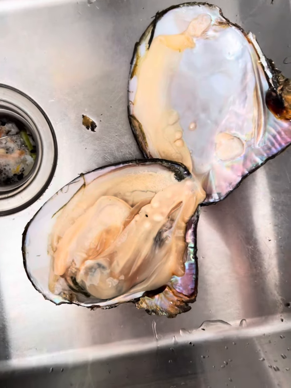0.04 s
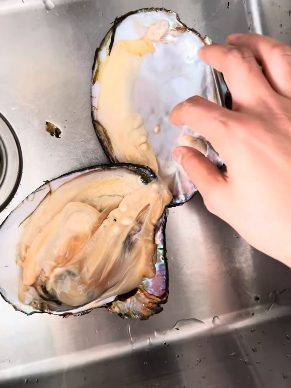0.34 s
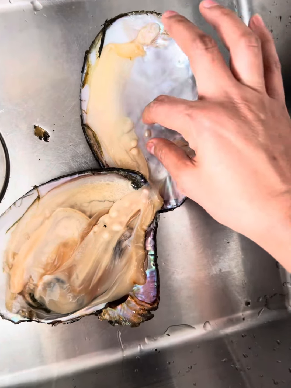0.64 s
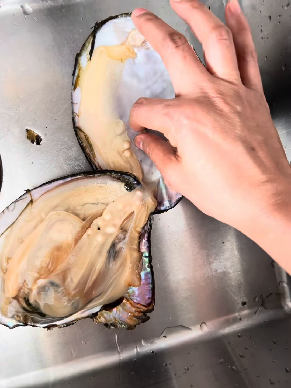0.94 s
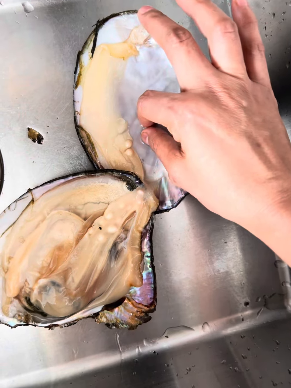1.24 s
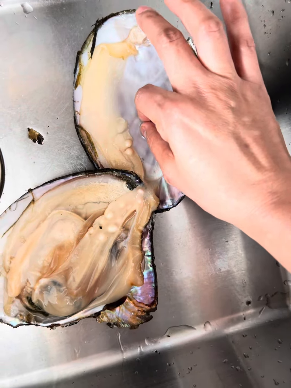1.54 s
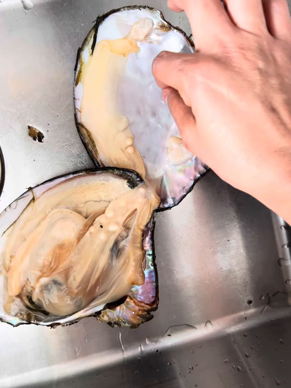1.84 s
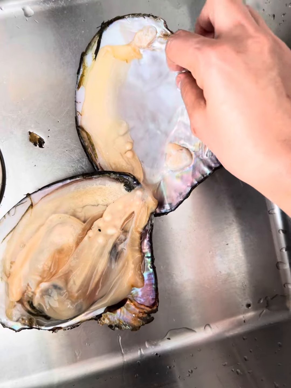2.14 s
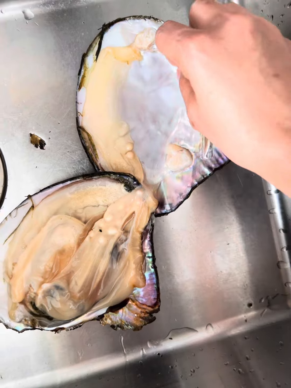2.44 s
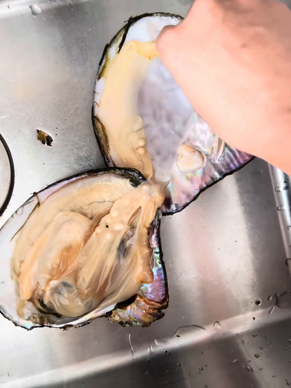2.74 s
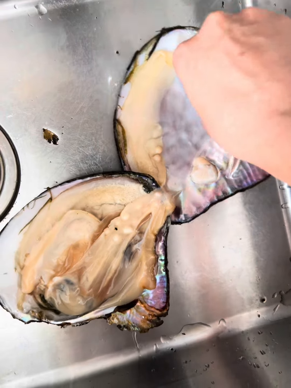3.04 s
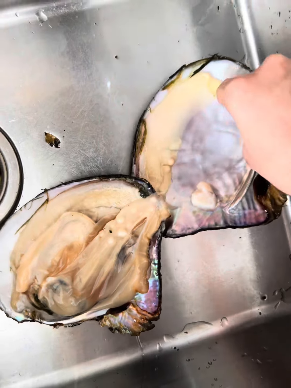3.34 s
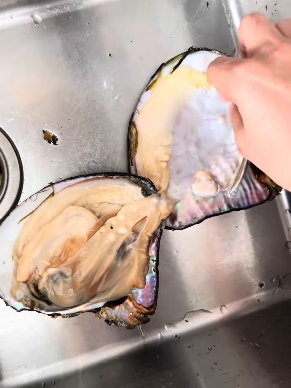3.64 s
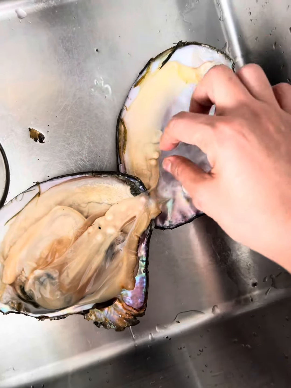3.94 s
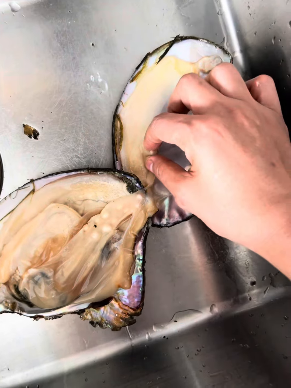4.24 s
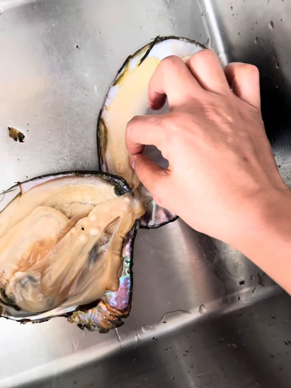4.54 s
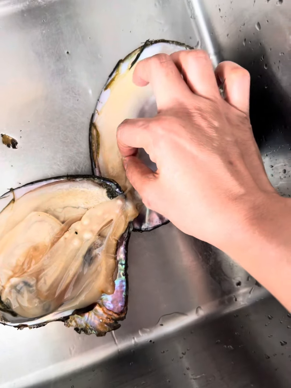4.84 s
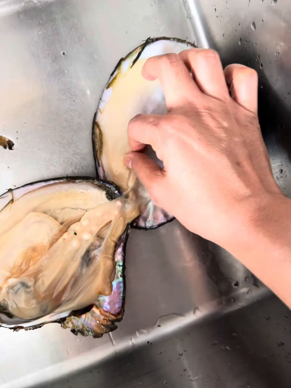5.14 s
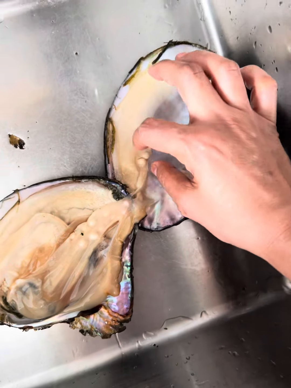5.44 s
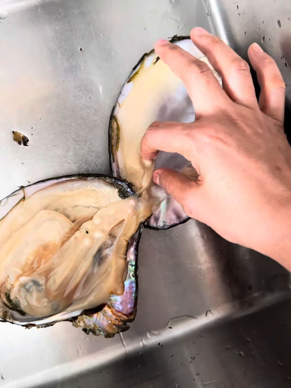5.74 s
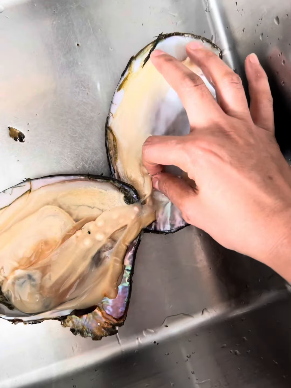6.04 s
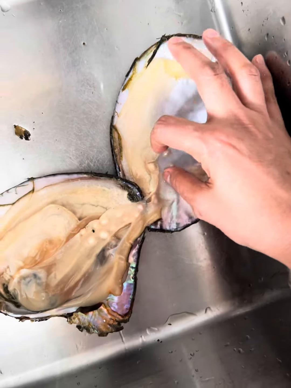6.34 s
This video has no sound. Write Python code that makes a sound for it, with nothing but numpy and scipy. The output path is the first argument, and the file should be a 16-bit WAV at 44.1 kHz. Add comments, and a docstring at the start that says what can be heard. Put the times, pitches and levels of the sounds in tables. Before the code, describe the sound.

Close up in a small kitchen, a hand picks at an opened shell lying in a stainless steel sink. Soft handling rumble and faint ticks give way to sharp fingernail clicks. The shell scrapes briefly over the steel, then rocks and knocks against the basin, which answers with short hollow booms. The knocks come thicker and louder near the end. An appliance hums steadily behind.

```python
"""Picking at a shell in a steel sink

A small kitchen, the microphone close to an opened shell lying in a stainless steel sink.
A hand picks at it: nails and chips click on the shell, it slides a little over the wet steel,
then rocks and knocks on the basin, whose thin floor booms. An appliance hums steadily behind."""
import sys
import numpy as np
from scipy import signal
from scipy.fft import rfft, irfft, next_fast_len
from scipy.io import wavfile
from scipy.ndimage import map_coordinates

SR = 44100
rng = np.random.default_rng(int(sys.argv[2]) if len(sys.argv) > 2 else 0)


def transcribe(u):
    """Save the signal u as a 16-bit wav file named by the first command-line argument.

    u: samples, shape (n,) or (channels, n), limited to [-1, 1]; the rate is SR.
    q: integer samples, one column per channel.
    """
    v = np.clip(np.atleast_2d(u).T, -1, 1)
    q = np.round(v * 32767).astype(np.int16)
    wavfile.write(sys.argv[1], SR, q)


N = 286209


def basin_knocks(modes_db=-14, crowd_db=9, bloom_s=0.003, rise_s=0.00015, rebound_s=0.045):
    """The shell's rim hits the basin: a clack, then the thin steel booms, damped by the wet shell."""
    # rim on steel: start_s, level_db, hardness_db, weight_db
    knocks = [(2.753, -39, -16, -19), (3.476, -21.5, -8, -0.5), (3.495, -33.5, -4.5, -11),
              (3.565, -28.5, -9, -1), (3.75, -40, -29, -15), (4.561, -27, -16.5, -0.5),
              (5.264, -36.5, -14, 3), (5.285, -37.5, -2, 2), (5.342, -30.5, -15, 4), (5.405, -36.5, -16, 0),
              (5.721, -30, -11.5, -8), (5.853, -17.5, 3, -2), (5.897, -21.5, -10.5, 2),
              (6.026, -30.5, -14, 10), (6.314, -33.5, -14, 7.5), (6.406, -15.5, -1, -2.5),
              (6.425, -16.5, -3, -11), (6.461, -25.5, -11, -10)]
    # the basin's strongest modes: pitch_hz, level_db, t60_s
    basin_modes = [(88, -10, 0.23), (161, -17, 0.14), (201.9, 16.5, 0.44), (212, -21, 0.17),
                   (267.6, 16, 0.19), (373, -2, 0.17), (417.4, 5, 0.062), (600.6, -3.5, 0.66),
                   (675, -5.5, 0.12), (790, -16, 0.084), (811, 0, 0.072), (956, -9.5, 0.16),
                   (1113.4, -13, .22), (1203, -5.5, 0.032), (1390, -17.5, 0.098), (1666, -15.5, .25),
                   (1993, -10, .15), (2385, -2, 0.082), (2500, 1, 0.059), (2600, -9, 0.19),
                   (2744, -24, 0.11), (3080, -38, .15)]
    # its crowd of weaker modes: frequency_hz, density_db
    crowd_spectrum = [(40, -21), (90, -27), (170, -0.5), (280, 9), (490, -10), (650, -6.5), (1300, -8),
                      (2600, -7), (3800, -15), (5200, -32), (9000, -41.5), (16000, -97)]
    # how long that crowd rings: frequency_hz, t60_s
    crowd_decay = [(100, 0.34), (700, 0.13), (2500, 0.062), (8000, 0.047)]
    # the basin's answer where the shell rests: time_s, hollow_note_hz, boom_db
    resting_spots = [(3.6, 595, -1), (4.55, 780, -10), (5.35, 815, -3), (5.75, 677, -1.5), (6.05, 677, -6),
                     (6.35, 566, -4.5)]
    spot_s, spot_hz, spot_db = np.transpose(resting_spots)
    out, t, last_s = np.zeros(N), np.arange(SR // 2) / SR, -np.inf
    attack = 1 - np.exp(-t / rise_s)
    for start_s, level_db, hardness_db, weight_db in knocks:
        blow = amp(modes_db) * ring(basin_modes, t, scatter_db=1.5, detune=0.0009, longest_s=0.21)
        blow += amp(crowd_db) * shaped(dying_noise(crowd_decay, len(t)) * attack, crowd_spectrum)
        # the low modes take some milliseconds to build up
        low = signal.sosfiltfilt(signal.butter(2, 330, fs=SR, output="sos"), blow)
        blow -= low * np.exp(-t / bloom_s) * attack
        # contacts lighter than a medium -31 dB favour the boom, hard ones the treble
        boom_db = np.interp(start_s, spot_s, spot_db) - 0.31 * (level_db + 31)
        blow = shaped(blow, [(200, boom_db), (520, 0), (1200, 0.011), (2800, hardness_db)])
        # on a rebound the floor is still loaded: a higher thump, a weaker hollow note
        thump_hz, note_db = (131, 5) if start_s - last_s < rebound_s else (81.7, 9)
        note_hz = np.interp(start_s, spot_s, spot_hz)
        blow = shaped(blow, [(note_hz / 1.3, 0), (note_hz, note_db), (note_hz * 1.26, 0)])
        add(out, start_s, amp(level_db) * (blow + amp(weight_db) * floor_thump(t, thump_hz)))
        last_s = start_s
    return out


def floor_thump(t, end_hz, start_hz=270, glide_s=0.01134, peak_s=0.026, sharpness=3.8):
    """Bending waves cross the basin's floor, short ones first: a falling pitch that swells and stops."""
    phase = 2 * np.pi * (end_hz * t + (start_hz - end_hz) * glide_s * (1 - np.exp(-t / glide_s)))
    envelope = (t / peak_s * np.exp(1 - t / peak_s)) ** sharpness
    tuning = 1 + 0.039 * rng.standard_normal()
    return envelope * np.sin(phase * tuning)


def shell_clicks(modes_db=-9, crack_db=-2, walls_db=-13, rise_s=0.00037, grip_s=4.0):
    """A brief crack rings the stiff, finger-damped shell and scatters between the basin's walls."""
    # nails and chips on the shell: start_s, level_db, snap_db, pitch_ratio
    contacts = [(1.198, -38, -17, 1), (2.093, -47, -4, 1.45), (2.682, -39.5, -2, 1),
                (2.6955, -23, 9.5, 1.06), (2.752, -36, -28, 1.2), (3.1753, -28, -12, .8),
                (3.6239, -18, 3, 1), (3.6377, -35, -2, 1.05), (5.1213, -51, -3, 1.2),
                (5.2889, -22.5, 2, 1.03), (5.3235, -33.5, -3.5, 1), (5.353, -40, -15, .85),
                (5.389, -38, -3, 1), (5.4161, -25, -13, 1), (6.0301, -24, -0.5, 1), (6.052, -36.5, -1, 1),
                (6.065, -41, -8, 1.3)]
    # a contact's burst: frequency_hz, density_db
    crack_spectrum = [(500, -26), (1400, 4.5), (2500, 12), (4000, 7.5), (7000, 1.5), (12500, -7.5),
                      (15500, -2.5)]
    out, t = np.zeros(N), np.arange(SR // 6) / SR
    attack = 1 - np.exp(-t / rise_s)
    burst_decay = amp(crack_db) * fade(t, t60_s=0.0057) + amp(walls_db) * fade(t, t60_s=0.059)
    # the shell's modes: pitch_hz, level_db, t60_s
    shell_modes = [(2060, -15, 0.023), (2616, -6.5, 0.025), (2630, 4, 0.016), (3467, 5, 0.036),
                   (3800, -3, 0.038), (4000, -27, .018), (4130, -26, 0.018), (5160, -4, 0.023),
                   (6400, -11, 0.045), (7600, -18, 0.024), (8800, -8.5, 0.029), (11570, -9, 0.02)]
    for start_s, level_db, snap_db, pitch_ratio in contacts + nail_ticks():
        burst = noise(crack_spectrum, len(t)) * burst_decay
        ringing = ring(shell_modes, t * pitch_ratio, scatter_db=0, detune=0.008, longest_s=0.022)
        click = (burst + amp(modes_db) * ringing) * attack
        # once the fingers press on the shell they damp its lowest modes
        body_db = -14.5 if start_s > grip_s else 1
        tone = [(700, body_db - 4.5), (2650, body_db), (3300, 0), (6000, snap_db / 4), (11000, snap_db)]
        add(out, start_s, amp(level_db) * shaped(click, tone))
    return out


def nail_ticks(per_s=1.5, level_db=-55, spread_db=2, snap_db=2, pitch_ratio=1.3):
    """Faint chance touches of the nails, as extra rows of contacts on the shell."""
    return [(rng.random() * N / SR, level_db + spread_db * rng.standard_normal(), snap_db, pitch_ratio)
            for _ in range(round(per_s * N / SR))]


def shell_slide(level_db=-47.5, catches_per_s=320, catch_share=0.48):
    """The shell's rough back catches and grates as it drags over wet steel."""
    # shell on steel: frequency_hz, density_db
    scrape_spectrum = [(200, -3), (700, 10.5), (1500, 0.5), (2400, 8.5), (3000, 1), (4000, -4),
                       (7000, -14.5), (12000, -21.5), (15500, -19)]
    catches = (rng.random(N) < catches_per_s / SR) * rng.standard_normal(N)
    rattle = fade(np.arange(SR // 50) / SR, t60_s=0.014)
    grit = np.sqrt(np.abs(signal.fftconvolve(catches ** 2, rattle)[:N]))
    scrape = unit((1 - catch_share + catch_share * unit(grit)) * noise(scrape_spectrum))
    return amp(level_db) * swell(3.188, rise_s=0.17, fall_s=0.08) * scrape


def finger_brush(resting_db=-82):
    """Skin whispers over the shell's smooth inside."""
    # finger strokes: start_s, length_s, level_db
    strokes = [(0.123, 0.14, -61.5), (0.424, 0.15, -67.5), (2.47, 0.2, -69.5), (3.476, .02, -60),
               (5.023, .03, -64)]
    # skin on shell: frequency_hz, density_db
    skin_spectrum = [(800, -1), (2000, 12), (3700, 5), (7000, -8.5), (11000, -5), (13000, -11), (15500, -5)]
    stroking = sum(amp(db) * swell(start_s, rise_s=0.038, fall_s=0.84 * length_s, hold_s=length_s)
                   for start_s, length_s, db in strokes)
    return (amp(resting_db) + stroking) * noise(skin_spectrum)


def handling(lumps_db=1.5, still_rumble_db=-50, still_murmur_db=-53):
    """Each move of the hand swells an uneven rumble and, through the shell, a murmur of the basin."""
    # the hand shifts its hold: middle_s, half_length_s, rumble_db, murmur_db
    moves = [(.27, 0.28, -38.5, -47), (0.782, 0.41, -60, -41), (1.89, 0.065, -60, -45),
             (3.32, 0.34, -47.5, -43), (3.546, 0.21, -42, -49), (4.26, 0.37, -49.5, -48.5),
             (5.332, 0.23, -42, -43.5), (6.45, 0.25, -39, -45.5)]
    # the hand's rumble: frequency_hz, density_db
    rumble_spectrum = [(25, -31.5), (60, 5), (85, 5.5), (125, -11.5), (320, -38), (700, -37), (3000, -67)]
    # the murmur of the basin's floor: frequency_hz, density_db
    murmur_spectrum = [(80, -12), (115, 0), (145, 4), (175, -22), (210, -3.5), (280, -6.5), (400, -23.5),
                       (1100, -32.5), (2500, -40.5), (6000, -77)]
    rumble = unit(noise(rumble_spectrum) * amp(lumps_db * wobble(14)))
    murmur = unit(noise(murmur_spectrum) * amp(lumps_db * wobble(14)))
    moving = sum(swell(middle_s, half_s, half_s) * (amp(rumble_db) * rumble + amp(murmur_db) * murmur)
                 for middle_s, half_s, rumble_db, murmur_db in moves)
    return moving + amp(still_rumble_db) * rumble + amp(still_murmur_db) * murmur


def fading_note(pitch_hz=1011, level_db=-54, t60_s=1.9, waver_rad=0.39):
    """A faint, unsteady note dies away at the start."""
    t = np.arange(N) / SR
    return amp(level_db) * fade(t, t60_s) * np.sin(2 * np.pi * pitch_hz * t + waver_rad * wobble(40))


def appliance(rush_db=-41, hum_db=-1, waver_db=3.5, drift_rad=0.33, flutter_db=1.2):
    """Wavering motor tones over a hollow rush whose middle range flutters."""
    # motor tones: pitch_hz, level_db
    motor_tones = [(70.0, -51.5), (134.6, -48), (269.2, -49), (430.7, -61.5), (538.3, -62)]
    # the appliance's rush: frequency_hz, density_db
    rush_spectrum = [(20, -34), (35, -8), (60, 0), (130, -5), (300, -11), (480, -17.5), (700, -20.5),
                     (1100, -23), (1900, -32), (2500, -37.5), (3200, -41), (5500, -51.5), (9500, -55),
                     (15500, -56.5)]
    # resonances that colour the rush: centre_hz, width_hz, gain_db
    hollows = [(140, 25, 7.5), (197, 10.5, 3), (292, 42, 2), (568, 23, 9.5), (2410, 360, 6.5)]
    hum, t = np.zeros(N), np.arange(N) / SR
    for hz, db in motor_tones:
        strength = np.sqrt(2) * amp(db + waver_db * wobble(6.6))
        hum += strength * np.sin(2 * np.pi * hz * t + drift_rad * wobble(10))
    colour = lambda f: amp(sum(db / (1 + (2 * (f - hz) / width) ** 2) for hz, width, db in hollows))
    rush = unit(filtered(noise(rush_spectrum), colour))
    middle = filtered(rush, lambda hz: (hz > 300) & (hz < 1300))
    flutter = middle * (amp(flutter_db * wobble(11)) - 1)
    return amp(hum_db) * hum + amp(rush_db) * (rush + flutter)


def kitchen(direct, room_db=-18, build_s=0.0014):
    """Hard walls add a short tail to the close sound; a fresh random tail is drawn every quarter second."""
    # the room's decay: frequency_hz, t60_s
    room_decay = [(150, 0.15), (1500, 0.32), (4000, 0.29), (14000, 0.26)]
    wet, t, step = np.zeros(N), np.arange(SR // 2) / SR, SR // 4
    for start in range(0, N, step):
        tail = dying_noise(room_decay, len(t)) * (1 - np.exp(-t / build_s))
        add(wet, start / SR, signal.fftconvolve(direct[start:start + step], tail / np.linalg.norm(tail)))
    return direct + amp(room_db) * wet


def ring(modes, t, scatter_db, detune, longest_s):
    """Damped modes, t60 capped at longest_s; each touch draws their signs, strengths and tuning anew."""
    hz, db, t60_s = np.transpose(modes)[:, :, None]
    strength, shift, side = rng.standard_normal((3, len(modes), 1))
    envelope = np.sign(side) * amp(db + scatter_db * strength) * fade(t, np.minimum(t60_s, longest_s))
    return np.sum(envelope * np.sin(2 * np.pi * hz * (1 + detune * shift) * t), axis=0)


def dying_noise(decay, size):
    """White noise whose bands each die at their own speed."""
    hz, t, bands = signal.stft(rng.standard_normal(size), SR, nperseg=256)
    return signal.istft(bands * fade(t, along(decay, hz)[:, None]), SR)[1][:size]


def noise(spectrum, size=N):
    """Coloured noise of rms 1."""
    return unit(filtered(rng.standard_normal(size), lambda hz: amp(along(spectrum, hz))))


def filtered(x, response):
    """x with its spectrum multiplied by response(hz)."""
    size = next_fast_len(len(x) + 8192)
    return irfft(rfft(x, size) * response(np.fft.rfftfreq(size, 1 / SR)), size)[:len(x)]


def shaped(x, points, size=4096):
    """x through a minimum-phase filter drawn by points of frequency_hz, gain_db."""
    cepstrum = irfft(np.log(amp(along(points, np.fft.rfftfreq(size, 1 / SR)))))
    cepstrum[1:size // 2] *= 2
    cepstrum[size // 2 + 1:] = 0
    return signal.fftconvolve(x, irfft(np.exp(rfft(cepstrum))))[:len(x)]


def along(points, hz):
    """Points of frequency_hz, value read on a log frequency axis."""
    point_hz, values = np.transpose(points)
    return np.interp(np.log(hz + 1), np.log(point_hz + 1), values)


def swell(peak_s, rise_s, fall_s, hold_s=0):
    """A smooth envelope that reaches 1 at peak_s, holds and falls."""
    t = np.arange(N) / SR - peak_s
    return np.exp(-(np.minimum(t, 0) / rise_s) ** 2 - (np.maximum(t - hold_s, 0) / fall_s) ** 2)


def fade(t, t60_s):
    """Free decay by 60 dB in t60_s."""
    return np.exp(-np.log(1000) * t / np.maximum(t60_s, 1e-4))


def wobble(knots_per_s):
    """A smooth random curve."""
    return map_coordinates(rng.standard_normal(400), [np.arange(N) * knots_per_s / SR], mode="wrap")


def amp(db):
    """Decibels to gain."""
    return 10 ** (np.asarray(db) / 20)


def unit(x):
    """x scaled to rms 1."""
    return x / np.sqrt(np.mean(x ** 2) + 1e-20)


def add(track, start_s, sound):
    """Mix a sound in at start_s."""
    part = track[round(start_s * SR):][:len(sound)]
    part += sound[:len(part)]


def scene():
    """Shell and basin close up in the kitchen, over the hum, in mono."""
    sink = basin_knocks() + shell_clicks() + shell_slide() + finger_brush()
    return (kitchen(sink) + fading_note() + appliance() + handling())[None]


def record(dry, top_hz=15900):
    """The recorder cuts off steeply above top_hz."""
    return signal.sosfilt(signal.ellip(10, .2, 70, top_hz, fs=SR, output="sos"), dry)


dry = scene()
out = record(dry)
transcribe(out)
```